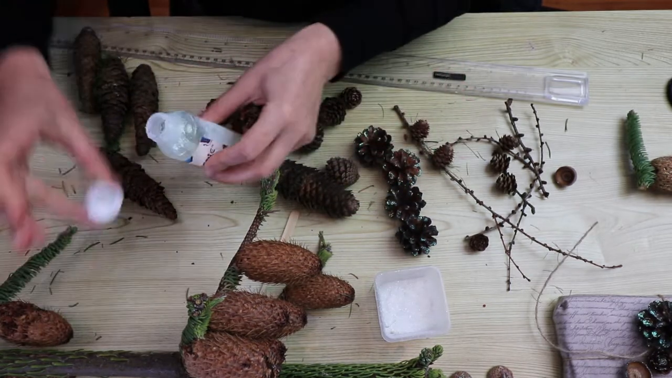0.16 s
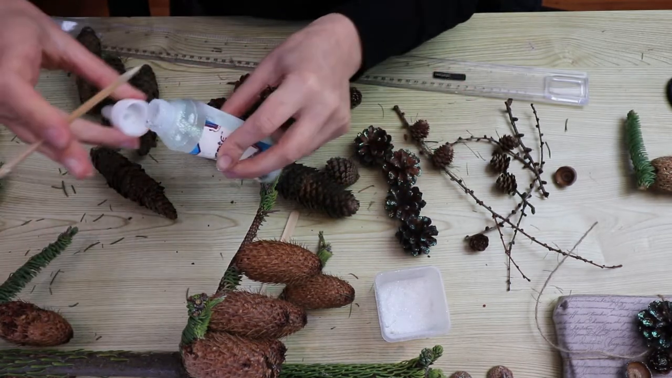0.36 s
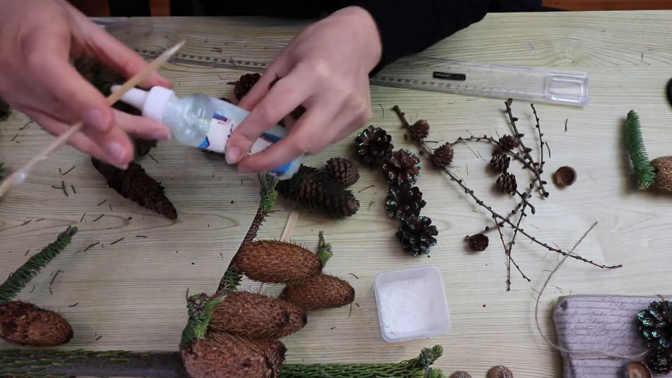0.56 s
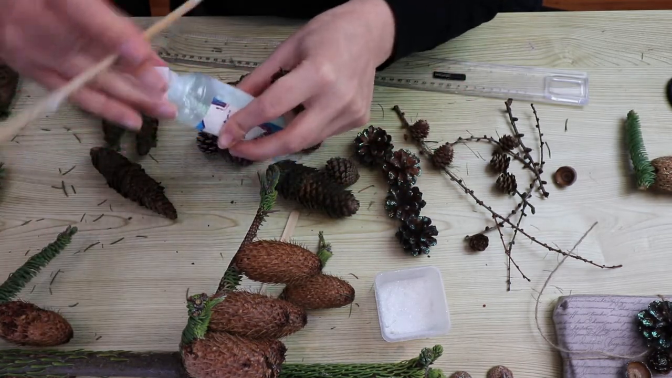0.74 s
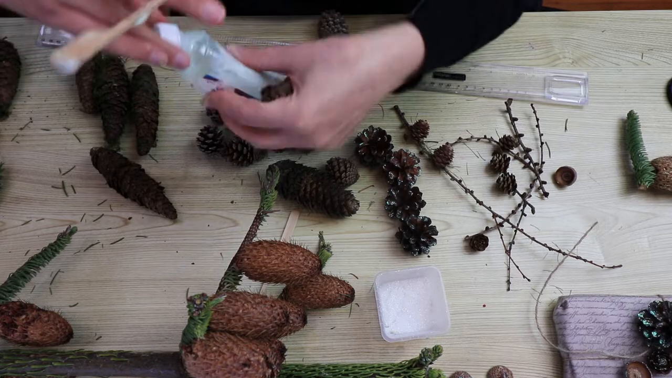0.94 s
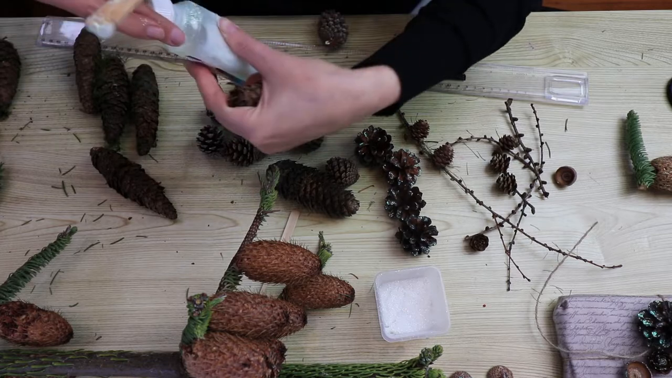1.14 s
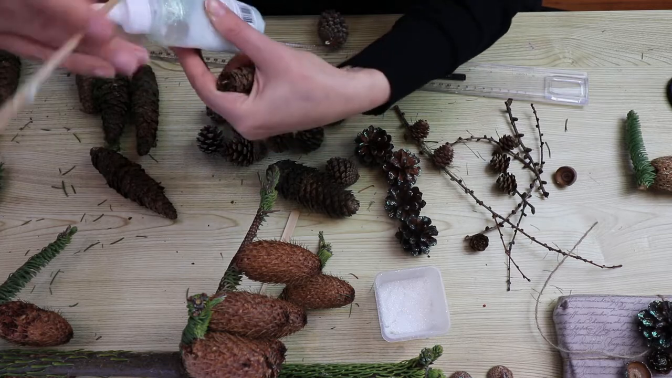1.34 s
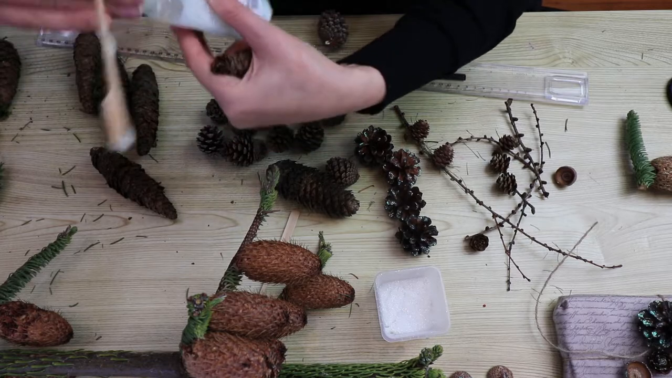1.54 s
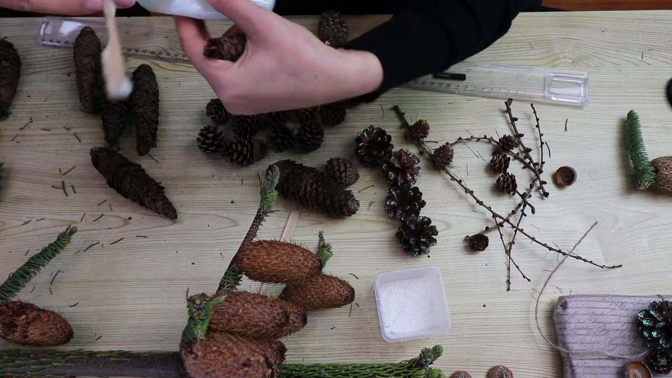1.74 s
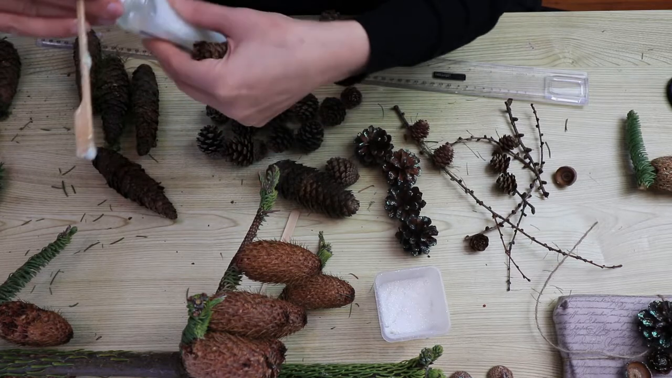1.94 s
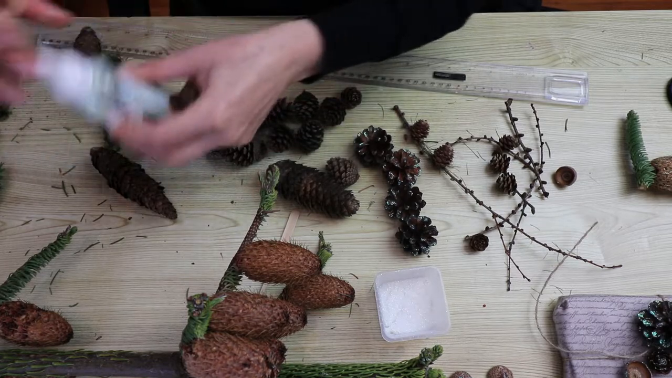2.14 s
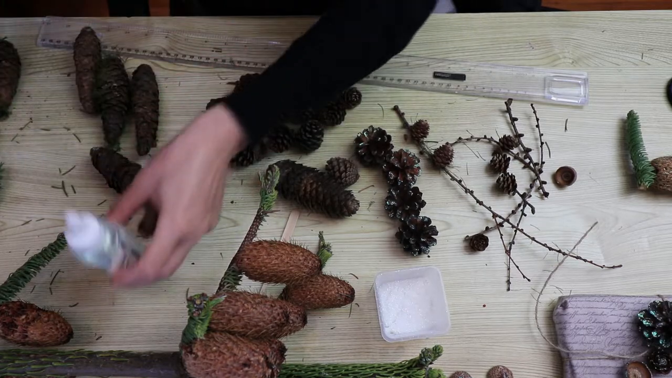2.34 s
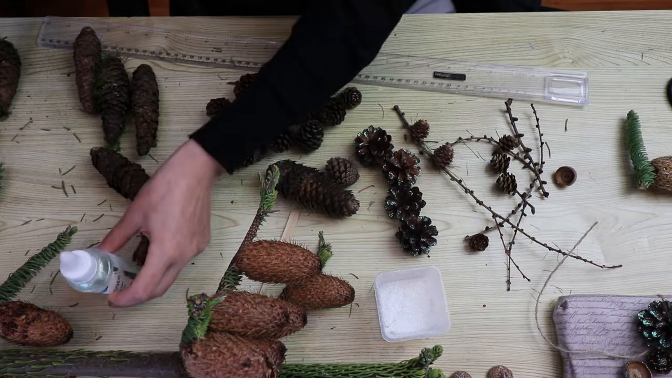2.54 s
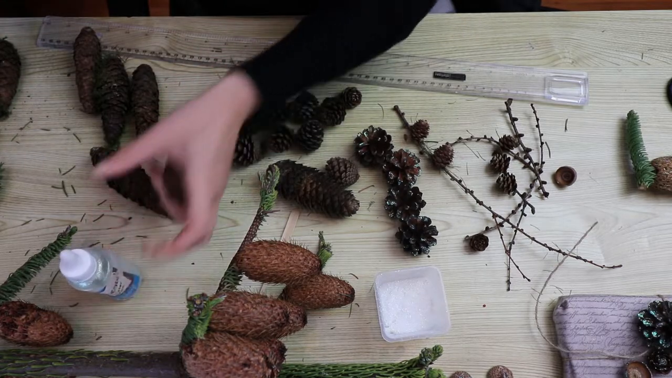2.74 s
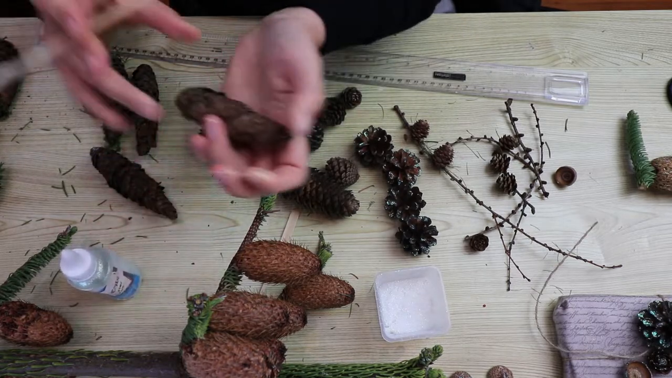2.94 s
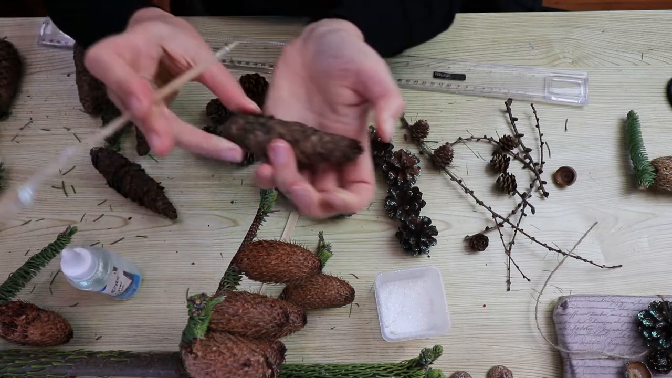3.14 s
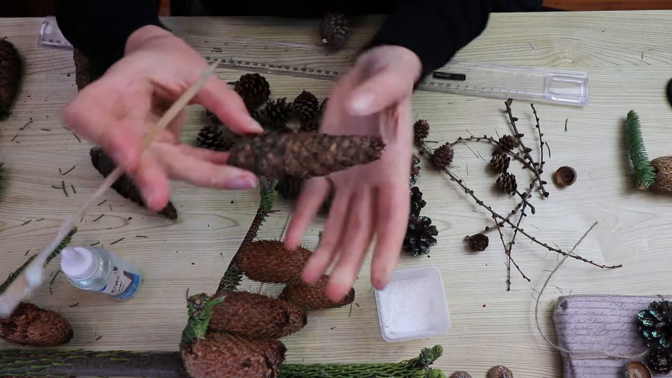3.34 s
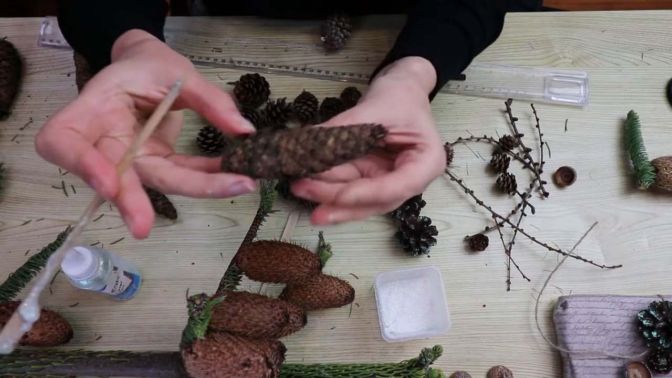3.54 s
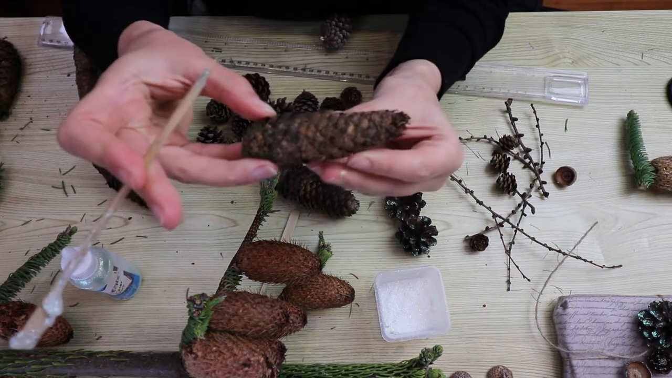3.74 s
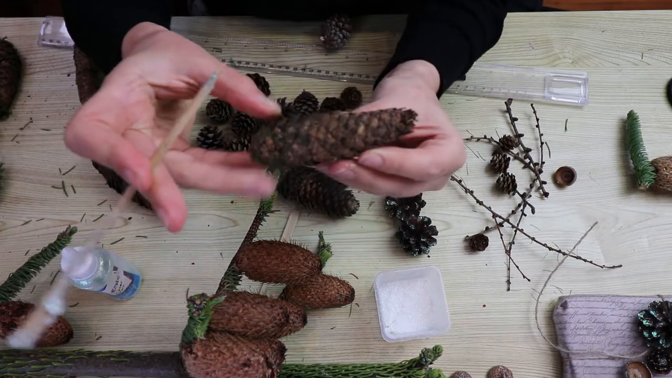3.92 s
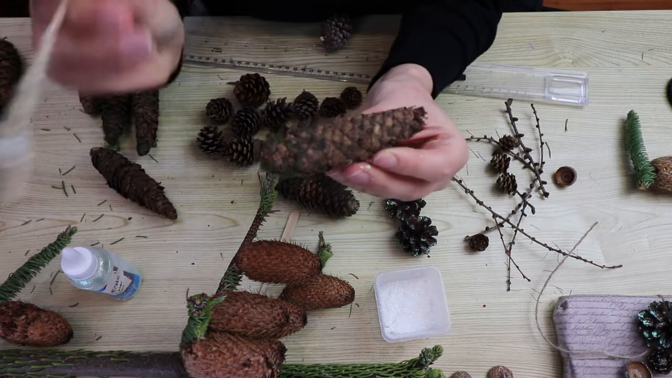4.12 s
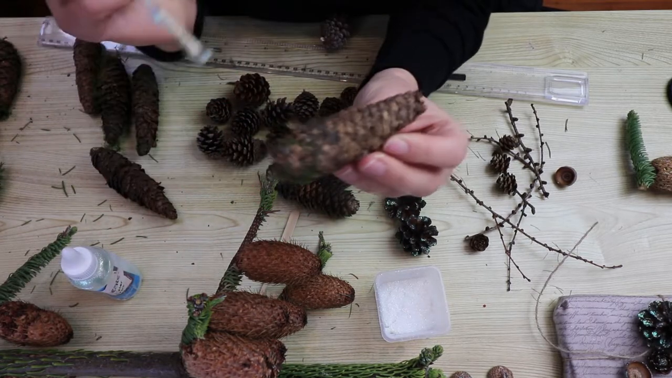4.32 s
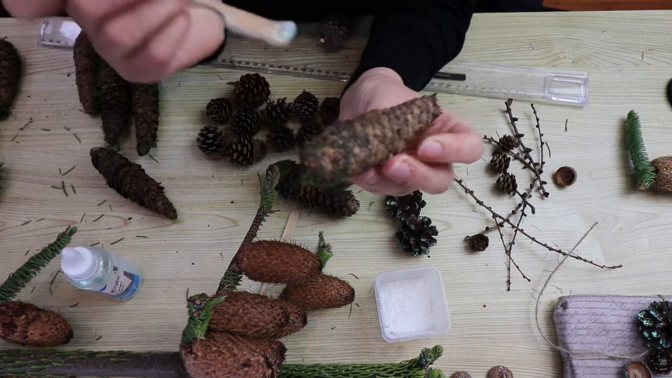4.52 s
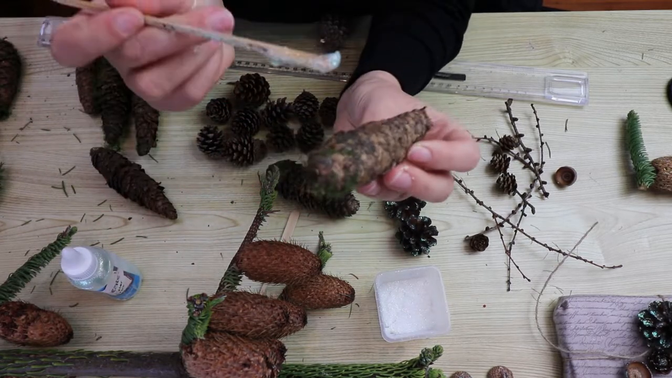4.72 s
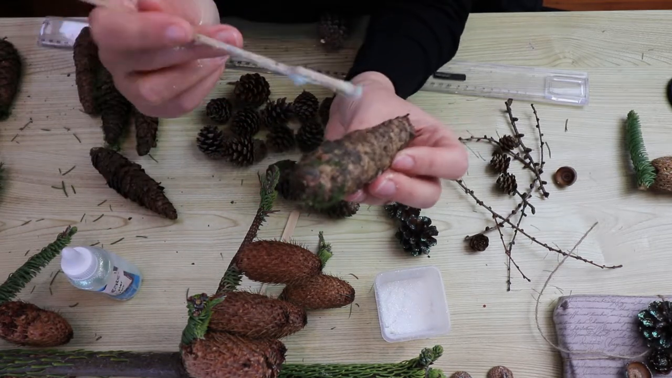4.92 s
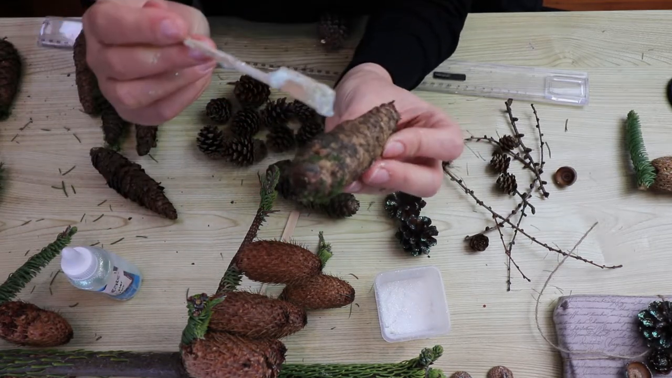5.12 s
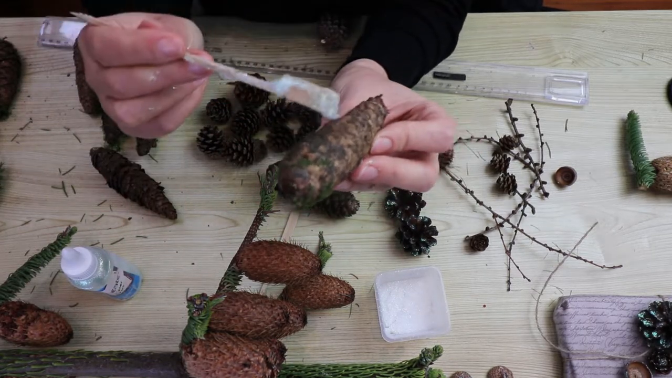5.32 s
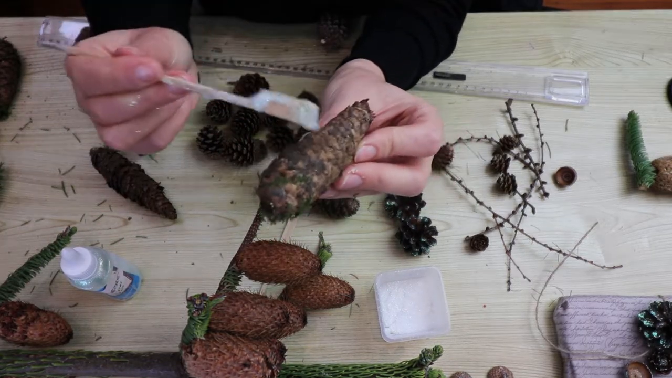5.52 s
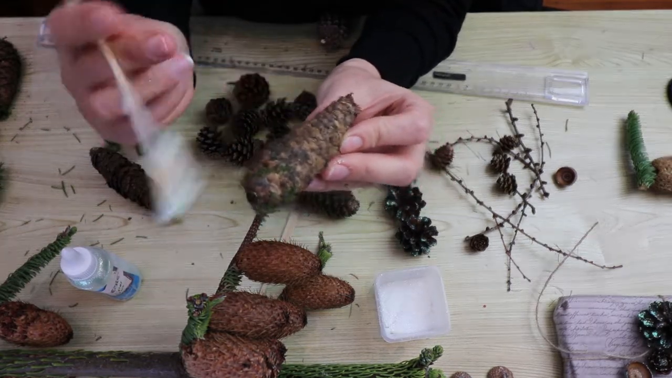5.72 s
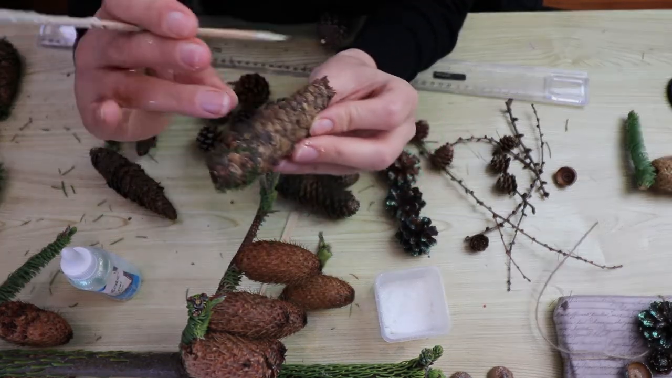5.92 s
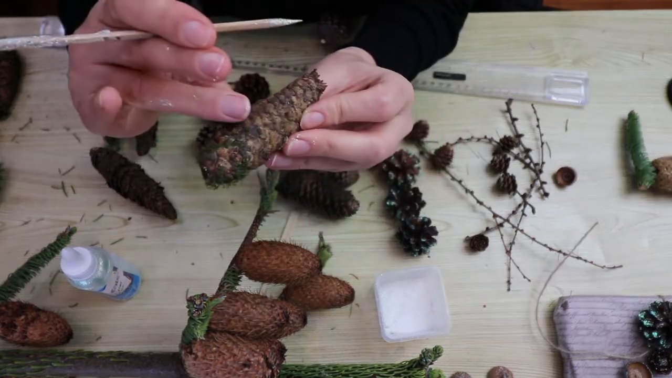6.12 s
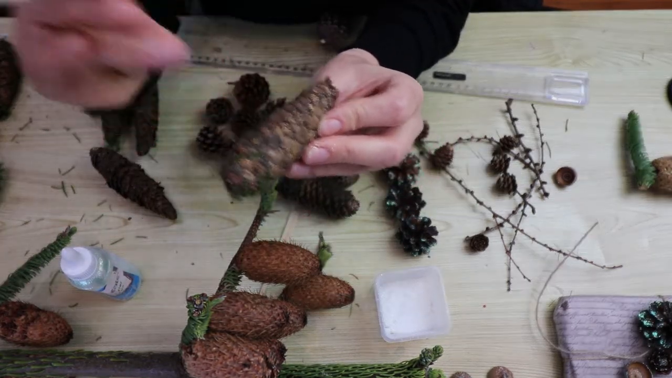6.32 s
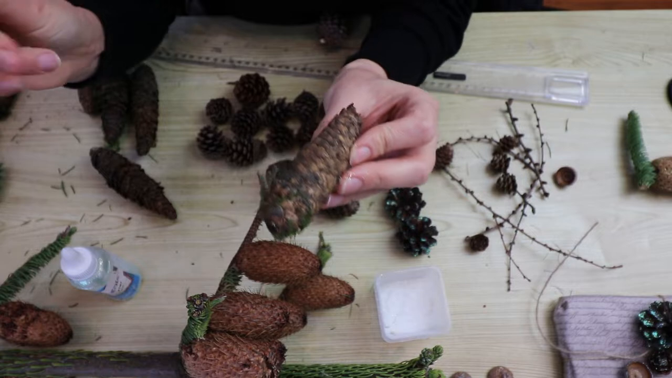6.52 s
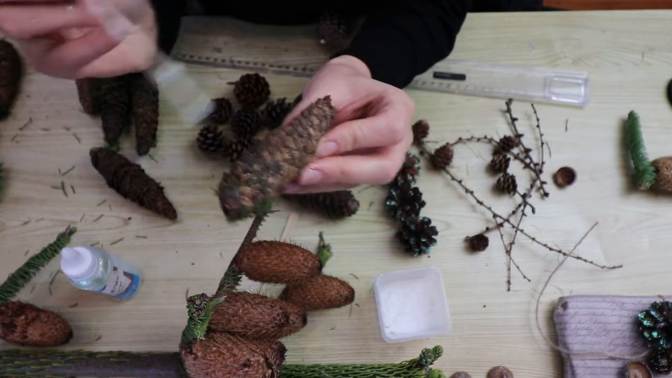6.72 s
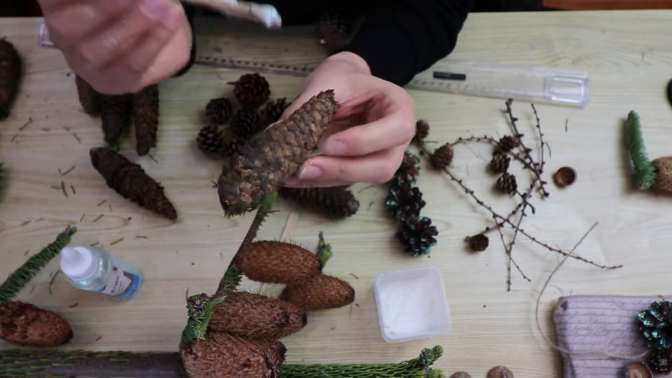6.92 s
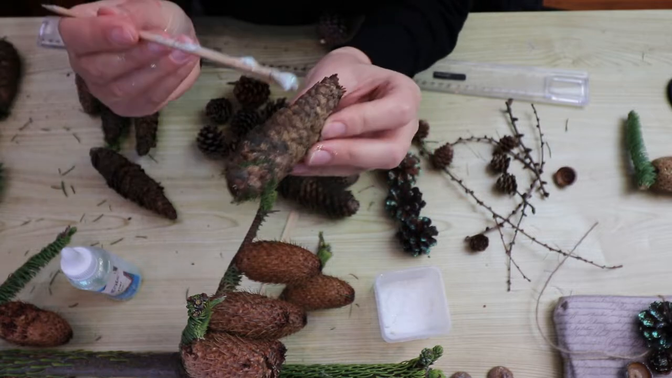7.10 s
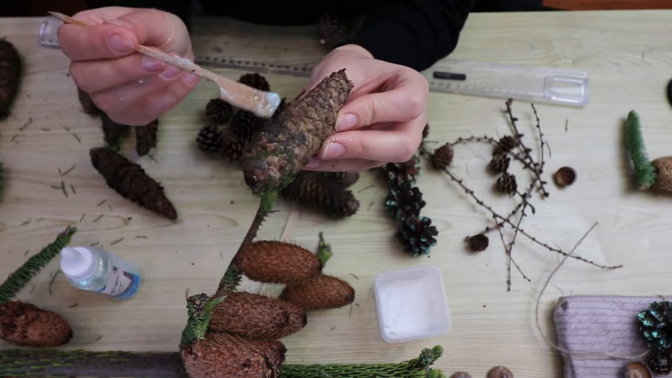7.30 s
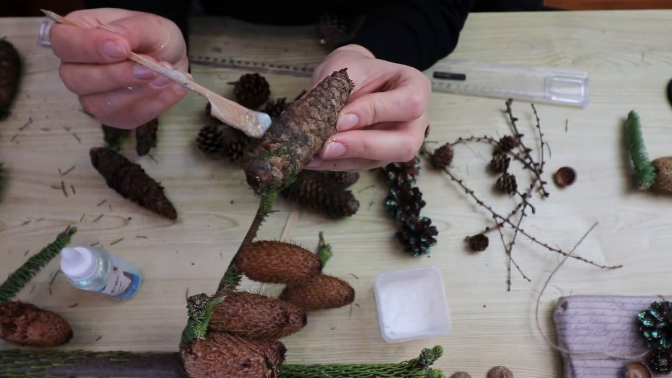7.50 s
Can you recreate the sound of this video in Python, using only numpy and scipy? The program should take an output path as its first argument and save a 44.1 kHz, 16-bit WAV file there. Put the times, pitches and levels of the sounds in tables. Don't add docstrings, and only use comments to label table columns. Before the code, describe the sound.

Close, quiet handling of a bottle, pine cone and stick over a wooden table: clacks, one firm knock, sparse crisp clicks, faint hiss.

```python
import sys
import numpy as np
from scipy import signal
from scipy.fft import rfft, irfft
from scipy.io import wavfile

SR = 44100
rng = np.random.default_rng(int(sys.argv[2]) if len(sys.argv) > 2 else 0)


def dump_mix(stems):
    frames = np.atleast_2d(stems).T
    limited = np.clip(frames, -1, 1)
    pcm = np.round(limited * 32767).astype(np.int16)
    wavfile.write(sys.argv[1], SR, pcm)


def to_linear_factor(level_db):
    exponent = np.asarray(level_db, float) / 20
    return 10 ** exponent


N = 337453


def at_hz(points, hz):
    point_hz, value = np.array(points).T
    return np.interp(np.log(hz), np.log(point_hz), value)


def curve(rows):
    s, level_db = np.transpose(rows)
    return to_linear_factor(np.interp(np.arange(N) / SR, s, level_db, left=-150))


def rms_one(x):
    return x / np.sqrt(np.mean(x ** 2) + 1e-20)


def band(x, low_hz, high_hz):
    edges = np.clip([low_hz, high_hz], 10, .45 * SR)
    return signal.sosfilt(signal.butter(2, edges, "band", fs=SR, output="sos"), x)


def above(x, hz):
    return signal.sosfilt(signal.butter(4, hz, "high", fs=SR, output="sos"), x)


def below(x, hz, order):
    return signal.sosfilt(signal.butter(order, hz, fs=SR, output="sos"), x)


def ring(clicks, hz, t60):
    r = to_linear_factor(-60 / (t60 * SR))
    w = 2 * np.pi * hz / SR
    return signal.lfilter([0, np.sin(w)], [1, -2 * r * np.cos(w), r * r], clicks + 1e-18)


def resonant_noise(hz, width_hz):
    t60 = np.log(1000) / np.pi / width_hz
    return rms_one(ring(rng.standard_normal(N), hz, t60))


def coloured_noise(spectrum):
    hz = np.maximum(np.arange(N // 2 + 1) * SR / N, 1)
    return rms_one(irfft(rfft(rng.standard_normal(N)) * to_linear_factor(at_hz(spectrum, hz)), N))


def add(out, s, sound, peak_db):
    i = round(s * SR)
    peak = np.abs(np.atleast_2d(sound).sum(axis=0)).max()
    out[..., i:i + sound.shape[-1]] += to_linear_factor(peak_db) * sound / peak


def crack(x, low_hz):
    dull = below(x, 12100, order=1)
    edge = signal.ellip(5, 1, 38, low_hz, "high", fs=SR, output="sos")
    return rms_one(signal.sosfilt(edge, dull) + to_linear_factor(-21.5) * above(dull, low_hz / 4))


def snaps():
    # (time [s], peak [dB], resonance [Hz], broad crack [dB])
    scales = [(1.006, -47, 4620, 0), (3.268, -38, 4530, 3), (3.292, -35, 7000, 8), (3.296, -40, 4000, -6),
              (3.306, -27, 3960, -5), (3.3041, -11, 10740, 12), (3.401, -47, 6550, -8),
              (3.985, -43, 6400, 17), (5.169, -39, 4930, 16), (5.189, -38, 4960, 20),
              (5.437, -31, 5700, -2), (5.4383, -39, 3460, -11), (5.4693, -27.5, 9250, 3),
              (5.4692, -31.5, 5350, -6), (5.487, -24.5, 11600, 6), (6.174, -33.5, 3460, 6.5),
              (6.289, -31, 11500, -7), (6.2938, -26, 3580, -3.5)]
    # (time [s], peak [dB], resonance [Hz], broad crack [dB])
    flakes = [(0.0187, -32, 3000, 18), (1.259, -43.5, 8100, 15), (1.5865, -47, 10000, 4),
              (1.605, -30.5, 8500, -11), (1.6182, -33, 8700, -4), (1.63, -38, 5800, 19),
              (1.632, -32.5, 8800, -19), (1.6812, -28.5, 9600, 20), (2.0642, -44, 7340, 9),
              (2.188, -40, 3930, 16), (2.564, -42, 3800, -4), (2.682, -37, 14600, -17),
              (2.7087, -26, 7600, -2), (4.94, -34, 9700, 10), (6.292, -19, 13900, 1.5),
              (6.984, -34, 9200, -2)]
    # (time [s], peak [dB], resonance [Hz], crackle [s])
    wood = [(1.6556, -46, 2770, 0.078), (1.845, -50, 1260, 0.024), (1.847, -38, 3900, 0.017),
            (1.849, -50, 2440, 0.023), (1.8475, -39, 1810, 0.0071), (1.873, -54, 1770, 0.0098),
            (2.565, -38, 1686, 0.015), (2.566, -36.5, 1240, 0.17), (2.674, -35, 710, 0.048),
            (2.985, -45.5, 850, 0.023), (3.018, -51.5, 920, 0.012)]
    # (time, peak, resonance, broad crack, lower edge [Hz], crackle [s])
    rows = [(s, db, hz, broad_db, 3160, .009) for s, db, hz, broad_db in scales]
    rows += [(s, db, hz, broad_db, 0.61 * hz, 0.0123) for s, db, hz, broad_db in flakes]
    rows += [(s, db, hz, -14, 1000, t60) for s, db, hz, t60 in wood]

    out, t = np.zeros((2, N)), np.arange(SR // 12) / SR
    grits = rng.standard_normal((len(rows), len(t)))
    for (s, peak_db, hz, broad_db, low_hz, t60), grit in zip(rows, grits):
        crackle = to_linear_factor(-9.0) * grit * to_linear_factor(-60 * t / max(t60, .002))
        burst = np.array([t == 0, crackle])
        narrow = band(burst, hz / 1.144, hz * 1.11)
        ringing = rms_one(band(narrow, hz / 1.3, hz * 1.27))
        add(out, s, ringing + to_linear_factor(broad_db) * crack(burst, low_hz), peak_db)
    return out


def struck(events, resonances, split_hz):
    out, click = np.zeros(N), np.eye(1, SR // 10)[0]
    for s, peak_db, hollow_db, sharp_db in events:
        body = to_linear_factor(sharp_db) * crack(click, 4700)
        for hz, width, db in resonances:
            once = band(click, hz - width / 2, hz + width / 2)
            twice = band(once, hz - width, hz + width)
            body = body + to_linear_factor(db + hollow_db * (hz < split_hz)) * rms_one(twice)
        add(out, s, body, peak_db)
    return out


def cap_on_neck():
    # (time [s], peak [dB], hollow part [dB], sharp part [dB])
    clacks = [
        (.5163, -20.5, 8.5, -12),
        (.5553, -8.5, -11.5, -13.5),
    ]
    # (frequency [Hz], width [Hz], level [dB])
    cap_modes = [(430, 190, 3.5), (573, 79, 3), (680, 166, 3), (990, 270, -8), (1440, 500, -15.5),
                 (2063, 350, 4.5), (2780, 780, -14.5), (3490, 520, -0.5), (4240, 570, 7), (5340, 980, 4),
                 (7000, 3000, -3.5)]
    return struck(clacks, cap_modes, split_hz=1000)


def stick_on_cone():
    # (time [s], peak [dB], hollow part [dB], sharp part [dB])
    ticks = [
        (6.943, -20.5, -15, 2),
        (7.002, -15.5, 10.5, -9.5),
    ]
    # (frequency [Hz], width [Hz], level [dB])
    stick_modes = [(2480, 350, -19), (3490, 760, -4.5), (4420, 1120, 3), (5300, 700, 4)]
    return struck(ticks, stick_modes, split_hz=3000)


def thuds():
    # (frequency [Hz], level [dB], decay t60 [s])
    table_modes = [(101.1, -18.5, 0.5), (113.2, -12, 0.43), (152, -19, 0.15), (175, -4.5, 0.2),
                   (189.4, -12, 0.64), (252.2, -17, 0.26), (271, 9.5, 0.019), (266, -28.5, .2),
                   (305, -16.5, 0.137), (359, -19, 0.08), (408, -1, 0.021), (609, -16, 0.1),
                   (692, -18, 0.11), (900, -16.5, 0.066)]
    # (time [s], strength [dB], contact [Hz], lowest [Hz], time until the hand damps the top [s])
    set_down = [
        (2.5641, -3.5, 507, 93, 0.23),
        (2.674, -27, 900, 300, 0.079),
        (2.729, -35.5, 500, 152, 0.07),
    ]
    # (time [s], strength [dB], contact, the harder the higher [Hz])
    touches = [(.012, -46.5, 226), (0.039, -56, 225), (.712, -48, 800), (.722, -35.5, 480),
               (0.755, -35.5, 300), (1.53, -51, 560), (1.657, -42, 600), (1.735, -49, 520),
               (1.743, -33.5, 510), (1.771, -72, 430), (1.849, -46.5, 920), (3.239, -43, 201),
               (3.28, -40.5, 175), (4.68, -45, 200), (4.709, -42, 199), (4.734, -51, 220), (5.46, -48, 220),
               (6.298, -48, 213), (6.97, -46, 203)]
    taps = [(s, db, hz, max(0.46 * hz, 111), 0.039) for s, db, hz in touches]
    roll = []
    for k, late in enumerate(rng.random(size=8)):
        s = 2.977 + .0095 * (k + late / 2)
        roll.append((s, -32 + 2 * np.sin(np.pi * k / 8), 523, 136, 0.05))
    rows = [*set_down, *taps, *roll]

    out, t = np.zeros(N), np.arange(SR // 2) / SR
    shudder = to_linear_factor(-40 - 60 * t / 0.44) * rng.standard_normal((len(rows), len(t)))
    lucks = rng.standard_normal((len(rows), len(table_modes)))
    for (s, blow_db, contact_hz, low_hz, free_s), shake, luck in zip(rows, shudder, lucks):
        push = below((t == 0) + shake, contact_hz, order=3)
        body = sum(to_linear_factor(db + z) * ring(push, hz, t60) for (hz, db, t60), z in zip(table_modes, luck))
        hand = np.exp(-np.maximum(t - free_s, 0) / 0.018)
        add(out, s, above(body, low_hz) * hand, blow_db)
    return out


def rustle():
    # (start [s], length [s], level [dB])
    brushes = [(-.04, 0.2, -50), (0.136, 0.28, -63), (1.563, 0.25, -53.5), (1.832, 0.071, -55.5),
               (2.62, 0.26, -56), (2.963, 0.21, -60.5), (7.12, 0.73, -66)]
    grains = rng.standard_normal(N) * to_linear_factor(4.2 * np.minimum(rng.exponential(1, N), 5))
    t = np.arange(N) / SR
    shape = np.array([0, 0.23, 0.23 + 0.26, 1])
    strokes = 0
    for s, length, db in brushes:
        swell_db = np.interp(t, s + length * shape, [-20, 0, 0, -20], -99, -99)
        strokes = strokes + to_linear_factor(db + swell_db)
    return strokes * rms_one(band(grains, 1130, 9400))


def room(x):
    # (frequency [Hz], t60 [s])
    room_t60 = [(100, 0.2), (350, 0.2), (650, 0.43), (2000, 0.16), (5000, 0.18), (14000, 0.18)]
    # (time [s],
    # spread [s], level [dB])
    echoes = [(.010, 0.016, -0.5), (0.022, 0.012, -1), (0.03, 0.0026, 0.5)]
    t = np.arange(SR // 2) / SR
    edges = 60 * 2 ** np.arange(0, 8.6, .5)
    white = rng.standard_normal((len(edges) - 1, len(t)))
    tail = 0
    for w, lo, hi in zip(white, edges, edges[1:]):
        tail = tail + band(w, lo, hi) * to_linear_factor(-60 * t / at_hz(room_t60, lo))
    clumps_db = sum(db * np.exp(-((t - s) / spread) ** 2) for s, spread, db in echoes)
    tail = tail * (1 - np.exp(-t / 0.00045)) * to_linear_factor(clumps_db)
    response = to_linear_factor(2.5) * tail / np.sqrt(np.sum(tail ** 2))
    response[round(.0018 * SR)] += to_linear_factor(-6)
    return signal.fftconvolve(x, response)[:N]


def traffic():
    # (time [s], level [dB])
    rumble = [(0, -64), (.6, -81), (.75, -71), (1.2, -77), (1.8, -69), (3.6, -71), (4.07, -67), (4.4, -73),
              (4.83, -68.5), (6.7, -69.5), (6.9, -66.5), (7.65, -65)]
    # (frequency [Hz], width [Hz], level [dB])
    drone_modes = [(114, 9.5, -1), (152.8, 8.1, 0), (198, 42, -2.5), (300, 135, -8.5)]
    drone = sum(to_linear_factor(db) * resonant_noise(hz, width_hz) for hz, width_hz, db in drone_modes)
    return to_linear_factor(6.5) * curve(rumble) * rms_one(band(drone, 48, 500))


def far_engine():
    # (time [s], level [dB])
    passing = [(7.05, -73), (7.072, -75), (7.146, -53), (7.318, -43.5), (7.53, -45), (7.592, -56),
               (7.65, -59)]
    firing_hz, width_hz = 38.85, 7.1
    tone = np.sin(2 * np.pi * firing_hz * np.arange(N) / SR)
    engine = tone + to_linear_factor(-22.0) * band(resonant_noise(firing_hz, width_hz), 14, 48)
    return to_linear_factor(-4.5) * curve(passing) * rms_one(engine)


def input_hiss():
    # (frequency [Hz], density [dB per Hz])
    air = [(20, 2.5), (60, -7), (120, 3), (400, -2), (1500, -5.5), (4000, -9.5), (8000, -12.5),
           (16000, -13.5)]
    # (frequency [Hz], density [dB per Hz])
    idle = [(20, -20), (60, -27), (130, -0.5), (300, -2), (1000, -1.5), (4000, -2.5), (7000, -4.5),
            (16000, -4.5)]
    hiss = np.array([to_linear_factor(-59.5) * coloured_noise(air), to_linear_factor(-66) * coloured_noise(idle)])
    return signal.sosfilt(signal.cheby2(12, 60, 16050 + 250, fs=SR, output="sos"), hiss)


def scene():
    clicks, crackle = snaps()
    cap, stick, blows = cap_on_neck(), stick_on_cone(), thuds()
    returns = room(clicks + stick + to_linear_factor(-10) * cap + to_linear_factor(-8.5) * blows)
    near = clicks + crackle + cap + stick + blows + returns
    left = above(near, 60) + rustle() + traffic() + far_engine()
    return np.array([left, np.zeros(N)])


def roll_off(x):
    return signal.sosfilt(signal.butter(12, 16680, fs=SR, output="sos"), x)


def record(dry):
    top = signal.cheby2(12, 60, 16900, fs=SR, output="sos")
    mix = signal.sosfilt(top, dry) + input_hiss()
    return roll_off(mix)


dry = scene()
out = record(dry)
dump_mix(out)
```